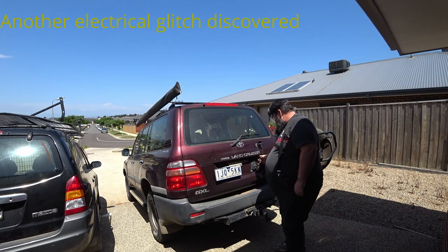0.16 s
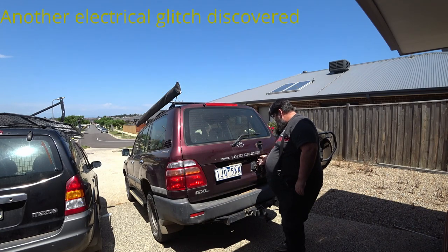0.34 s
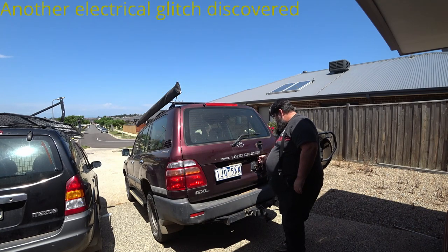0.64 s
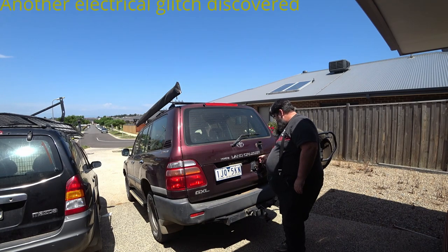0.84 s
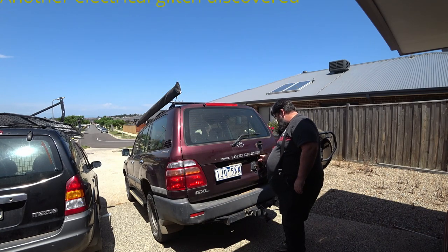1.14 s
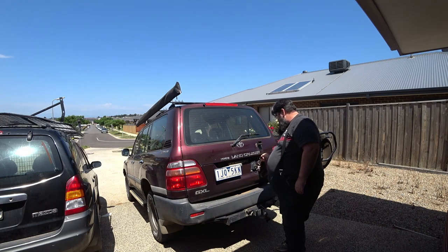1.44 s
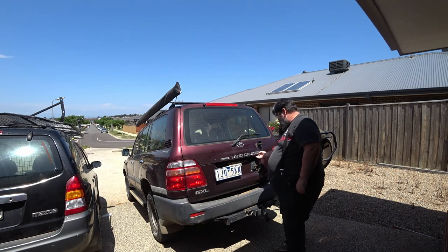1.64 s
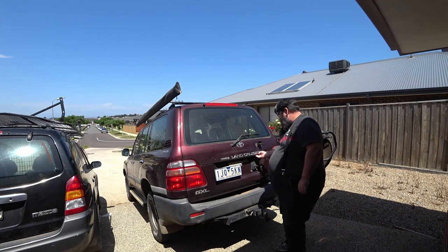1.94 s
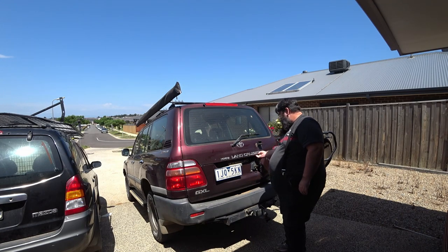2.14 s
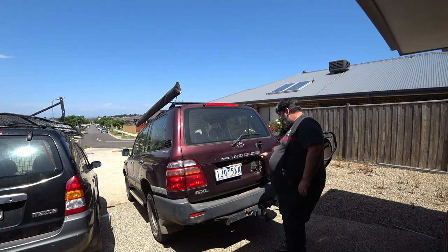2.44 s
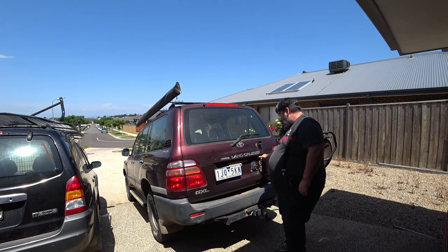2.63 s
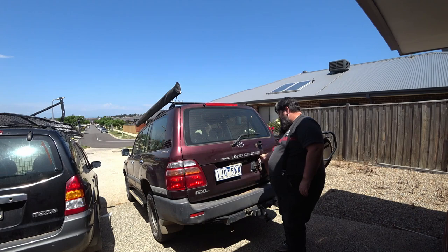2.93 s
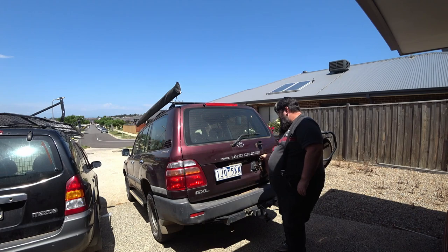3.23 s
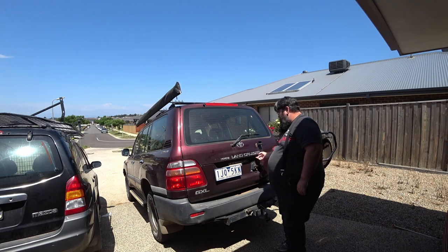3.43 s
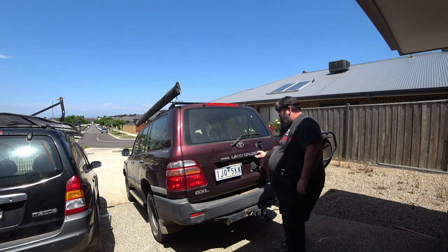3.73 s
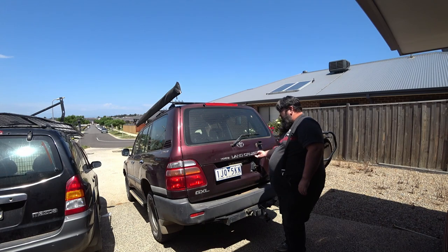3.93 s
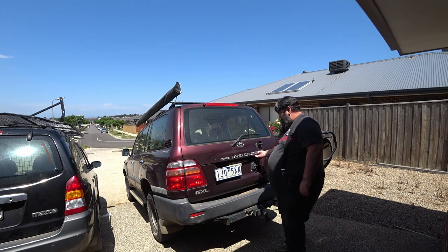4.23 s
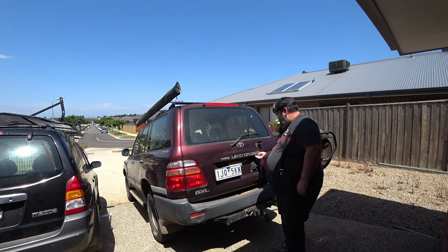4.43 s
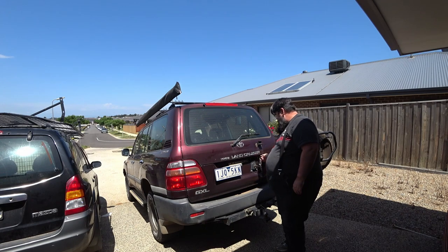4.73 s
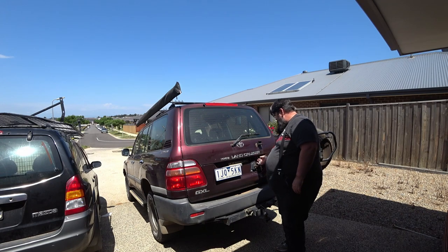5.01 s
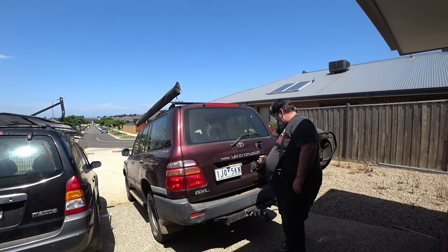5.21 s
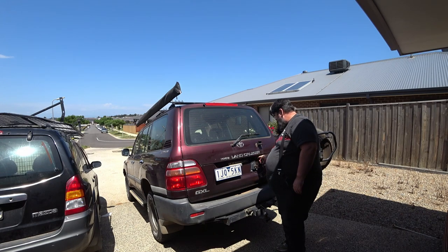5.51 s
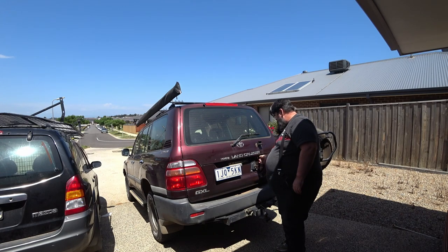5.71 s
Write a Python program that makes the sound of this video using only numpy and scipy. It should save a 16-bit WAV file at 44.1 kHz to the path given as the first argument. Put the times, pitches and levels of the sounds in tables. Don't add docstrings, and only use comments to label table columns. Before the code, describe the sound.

Close up under a carport, a bunch of keys jingles and scrapes against a vehicle's rear door. A loud, hard clack comes about a second and a half in, then spaced handle thumps, a sharp double knock at four and a half seconds, faint spring squeaks, and more key rattling. Distant birds whistle briefly behind. Stereo microphone nearby, with light wind rumble and far traffic.

```python
import sys
import numpy as np
from scipy import signal
from scipy.io import wavfile
from scipy.ndimage import uniform_filter1d

SR = 44100
rng = np.random.default_rng(int(sys.argv[2]) if len(sys.argv) > 2 else 0)


def transcribe(u):
    v = np.clip(np.atleast_2d(u).T, -1, 1)
    q = np.round(v * 32767).astype(np.int16)
    wavfile.write(sys.argv[1], SR, q)


def invert_db(x):
    u = np.asarray(x, float) / 20
    return 10 ** u


N = 258602
CONTACT_S = 0.002


# start_s, peak_db, boom_share_db, ring_s
HANDLE_PULLS = [(.71, -32.5, -8, 0.23), (.988, -41.5, -6, 0.5), (1.099, -43, 1.5, 0.21),
                (1.687, -42, -33, 0.45), (1.951, -30, -6, 0.19), (2.335, -15, -7.5, 0.15),
                (2.831, -55.5, 14.5, 0.3), (2.958, -19, -7, 0.26), (3.138, -44.5, -3.5, 0.61),
                (3.663, -38.5, -9, 0.26), (3.749, -27, 0.5, 0.065), (4.3, -41.5, -3.5, 0.23),
                (4.463, -60, -2, 1), (4.522, -12.5, -7, 0.16), (4.5615, -22, -1, 0.087),
                (5.368, -31, -13, 0.2)]
# start_s, peak_db, boom_share_db, ring_s
LATCH_CATCHES = [(0.364, -34, -57.5, 0.17), (.579, -32, -11, 0.13), (1.122, -39, -18, 0.2),
                 (1.405, -12.5, -11.5, 0.29), (1.423, -17, -13, 0.17), (1.825, -44, -9, 0.32),
                 (2.069, -47, -2.5, 0.22), (3.198, -37, -15, 0.22), (3.369, -47, -18, 0.15),
                 (3.705, -39, -16, 0.17), (3.76, -27, -6.5, 0.19), (5.079, -37.5, -4, 0.33),
                 (5.170, -28.5, -9, 0.24), (5.336, -31.5, -11.5, 0.22), (5.427, -38.5, -7, 0.28),
                 (4.5235, -7.5, -33, 0.072), (4.541, -21.5, -23, 0.15), (4.554, -21, 6, 0.035)]
# start_s, peak_db, boom_share_db, ring_s
ROD_RAPS = [(0.0, -33, -7, 0.28), (0.153, -37.5, 0, 0.51), (.175, -30, -24, 0.17), (.254, -40.5, -25, 0.38),
            (1.447, -16, -16, 0.37), (3.261, -37.5, -21, 0.11), (5.1895, -24, -14, 0.24),
            (5.203, -31.5, -3.5, 0.26), (5.217, -27.5, -25, 0.09), (5.778, -37.5, -2.5, 0.099)]
# start_s, peak_db, boom_share_db, ring_s
HANDLE_NUDGES = [(0.376, -33, -15, 0.043), (0.591, -31.5, -24, 0.047), (0.604, -37, -3, 0.13),
                 (0.618, -40, -20, 0.081), (0.726, -33.5, 0, 0.05), (0.737, -38, 1, 0.12),
                 (0.758, -40, -10, 0.07), (1.006, -55, -12, 0.055), (1.024, -59, 5, 0.058),
                 (1.067, -39, -7, 0.11), (1.098, -33, -12, 0.065), (1.112, -33, -10, 0.095),
                 (1.133, -37, -12, 0.07), (1.149, -45.5, -16, 0.082), (3.179, -37, -10, 0.07),
                 (3.372, -32.5, -9, 0.05), (3.398, -45, -13, 0.07), (5.097, -26.5, -10, 0.028),
                 (5.348, -31, -12, 0.07), (5.384, -47, -12, 0.11)]
# favoured_hz, share_1500_to_4000_hz_db
KNOCKING_PARTS = [
    (577, -14.5),
    (1020, -3),
    (1890, -6),
    (1210, -8.5),
]


def knocks():
    return by_part([HANDLE_PULLS, LATCH_CATCHES, ROD_RAPS, HANDLE_NUDGES], KNOCKING_PARTS)


def knock_db(hz):
    s, peak, boom, ring_s, centre, bright = knocks().T
    top = np.interp(np.log(hz), np.log([1200, 2200]), [0, 1]) * (bright + 8)
    bottom = np.interp(np.log(hz), np.log([280, 420]), [1, 0]) * (boom + 10)
    return peak + top + bottom + favoured(hz, centre, lift_db=5.0, octaves=0.41)


# start_s, peak_db, share_1500_to_4000_hz_db, ring_s, free_ring_db
BARREL_TURNS = [(.1501, -23.5, -2.5, 0.29, -9), (.174, -32, 7, 0.11, -6), (.2109, -23.5, -2.5, 0.2, -17),
                (.5916, -32, -33, 0.15, 6), (.7068, -29.5, -2, 0.11, -1.5), (1.0894, -33.5, -15, 0.21, 3),
                (1.4052, -8.5, -30, 0.15, -14), (1.946, -47.5, 11.5, 0.043, 3),
                (3.7604, -31.5, 2, 0.029, 3), (4.2986, -43.5, 7, 0.22, -11), (5.1317, -32, -26, 0.036, 2),
                (5.3328, -27.5, -1, 0.053, -18), (5.3597, -28.5, 6, 0.16, -13)]
BIG_KEY_TOUCHES = [(.1251, -37, -1, 0.14, -17), (0.506, -30.5, -11.5, 0.06, 4),
                   (0.251, -27, 1.5, 0.15, -30), (0.3634, -30.5, 2, 0.081, -30),
                   (0.8134, -35.5, -10, 0.1, 3), (.8315, -37, -1.5, 0.19, -7), (.889, -38, -8, 0.11, 0),
                   (.9308, -32.5, -2, 0.14, -15.5), (1.4463, -4, -3, 0.17, -18),
                   (1.5935, -26, -11.5, 0.11, -1), (2.3316, -57, 30, 0.038, 2), (3.16, -39.5, 2, 0.14, -27),
                   (3.197, -38, 3, 0.082, -16), (3.2878, -28, -3.5, 0.029, -23),
                   (4.521, -25, 10, 0.12, -20), (5.0809, -23.5, -2.5, 0.11, -7),
                   (5.1696, -35, -16, 0.095, -12), (5.1905, -35.5, -5, 0.1, 16),
                   (5.206, -30.5, -12, 0.14, -8)]
MIDDLE_KEY_TOUCHES = [(0.0134, -33, -4, 0.22, 7), (0.708, -34.5, 5.5, 0.12, 5.5),
                      (0.308, -35.5, -2, 0.056, 2), (0.323, -42, 10, 0.17, -6),
                      (1.025, -35.5, 7, 0.052, 11), (1.4256, -9.5, -2, 0.27, -12),
                      (1.664, -42.5, 1, 0.051, -3), (1.709, -32, -8.5, 0.14, -0.5),
                      (1.76, -34, -1.5, 0.096, -4), (2.9077, -40, -3.5, 0.97, -11),
                      (2.9558, -17, 0, 0.16, -22), (3.135, -40, 2, .06, -7), (3.2563, -29, -7.5, 0.16, 3),
                      (4.843, -19.5, -2, 0.12, -4), (4.855, -23.5, -7.5, 0.11, 9),
                      (4.9556, -26.5, -3.5, 0.078, 3), (4.9918, -27, -11.5, 0.069, -12),
                      (5.324, -37.5, 4.5, 0.07, 0), (5.429, -39, 8, 0.12, 6), (5.4736, -27, -4, 0.11, -1),
                      (5.777, -32.5, -3.5, 0.13, -2), (5.8205, -23.5, 2, 0.076, -12)]
SMALL_KEY_TOUCHES = [(0.385, -34, -15, 0.13, -10), (.4454, -32.5, -27, 0.073, -13),
                     (.5227, -34, -0.5, 0.097, -4), (.608, -42, -25, .05, -8),
                     (0.6655, -40.5, -19, 0.074, -5), (.741, -35, -20, 0.055, -5),
                     (1.144, -37, -25, 0.044, -8), (1.168, -34.5, -4, 0.041, 1),
                     (0.999, -29, -8, 0.11, -20), (1.8218, -42, -13, 0.05, -6),
                     (1.838, -40, -25, 0.039, -23), (5.2996, -32.5, -23, 0.09, 3),
                     (5.4902, -33.5, 2.5, 0.28, -7), (5.5752, -25, -13, 0.13, 4.5),
                     (5.683, -37, -30, 0.17, -6)]
RING_PINGS = [(.405, -28.5, -9, 0.083, 0), (0.557, -31, -37, 0.17, -11), (0.7276, -29, -21, 0.14, -0.5),
              (0.8298, -24.5, -11, 0.13, -2), (0.85, -24, -7, 0.092, 1), (0.893, -36.5, -7, 0.14, 4.5),
              (1.031, -35, -2, 0.21, 4), (1.154, -37, -16, 0.094, 6), (1.2216, -43, -2.5, 0.1, 7.5),
              (1.057, -41.5, -30, 0.11, 6), (1.263, -29.5, -49, 0.047, 5), (1.34, -44.5, -8, 0.29, -6),
              (1.3805, -25.5, -3, 0.19, -3), (1.512, -34, -30, 0.2, 3.5), (1.711, -47.5, -22, 0.39, 2),
              (3.0711, -27, 1, 0.067, -12), (3.3357, -37, 3.5, 0.16, -3), (5.641, -35, -6, 0.36, -2),
              (5.665, -35.5, -1, .1, 3.5), (5.705, -35, -20, 0.065, -4), (5.735, -41, -15, 0.071, -3)]
TAG_PINGS = [
    (.19, -46, -20, 0.12, 3),
    (.45, -40, -20, .15, -6),
    (5.59, -38, -25, .15, 0),
    (5.685, -36, -27, 0.23, 6),
]
BUNCH_PARTS = [
    (1760,),
    (2140,),
    (2940,),
    (6900,),
    (8650,),
    (7634,),
]


def jingle():
    touches = [BARREL_TURNS, BIG_KEY_TOUCHES, MIDDLE_KEY_TOUCHES, SMALL_KEY_TOUCHES, RING_PINGS, TAG_PINGS]
    return by_part(touches, BUNCH_PARTS)


def jingle_db(hz):
    s, peak, lower, ring_s, metal, centre = jingle().T
    reach = np.interp(np.log(hz), np.log([3300, 4800]), [1, 0]) * (lower + 12)
    return peak + reach + favoured(hz, centre, lift_db=6.0, octaves=0.21)


# start_s, bright_db, dull_db
SLIDES = [
    [(0.0, -30, -36.5), (0.276, -30, -47.5), (1.406, -35, -56), (1.586, -30.5, -48), (1.95, -43, -61)],
    [(2.88, -41, -51), (3.162, -29.5, -48), (3.43, -43, -42.5)],
    [(4.83, -35.5, -47.5), (5.406, -32, -68), (5.86, -31, -41.5)],
]


def sliding_db():
    return np.max([in_time(rows, -150) for rows in SLIDES], axis=0)


# pitch_hz, level_db per Hz
KNOCK_TONE = [(40, -20), (75, -12), (170, -3), (260, -10.5), (350, -5), (520, -8.5), (900, -4),
              (2000, -9.5), (7400, -25.5), (11000, -84)]
# pitch_hz, level_db per Hz
JINGLE_TONE = [(710, -21), (1200, -19.5), (1560, -13), (1800, -32), (2160, -14.5), (3430, -11.5), (8500, 0),
               (11500, -26.5), (15000, -47), (22000, -120)]
# pitch_hz, likeness (-1 to 1)
DOOR_ALIKE = [(60, 0.98), (220, 1), (830, 0.9), (3110, 0.61), (11600, 0.74)]


def handling():
    blows, touches, chatter = knocks(), jingle(), drift(124.0)
    bright_db, dull_db = sliding_db()

    def envelope(hz):
        longer = (hz / 1000) ** -0.3
        panel_db, keys_db = at_hz(KNOCK_TONE, hz), at_hz(JINGLE_TONE, hz)
        blow_db = knock_db(hz) + panel_db + 4.5
        touch_db = jingle_db(hz) - 7.5 + keys_db
        power = dying(blows[:, 0], blow_db, blows[:, 3] * longer, crack_db=5.5, crack_s=0.015, rise_s=0.0041)
        power += dying(touches[:, 0], touch_db, touches[:, 3], crack_db=5.0, crack_s=0.027, rise_s=0.002)
        power *= invert_db(4.2 * chatter)
        power += invert_db(2 * (bright_db - 23.0 + keys_db) + 7.5 * drift(27.0) + 7.9 * chatter)
        power += invert_db(2 * (dull_db + 5.5 + panel_db) + 2.1 * drift(34.5))
        return np.sqrt(power)
    return bands(envelope, DOOR_ALIKE)


# pitch_hz, level_db, time_to_fall_60_db_s
PANEL_MODES = [(71.5, -10, 0.12), (214.7, -22.5, 0.23), (243.5, -8, 0.37), (264.4, -2.5, 0.24),
               (442.5, 1.5, 0.064), (460.6, -11.5, 0.39), (508, -6, 0.22), (586, -3, 0.14), (685, -15, 0.1),
               (814.7, -5.5, 0.21), (900, -7, 0.16), (936, 5.5, 0.041), (1222, 1, 0.068),
               (1013, -4.5, 0.12), (1493, -3, 0.06), (1656, 3.5, 0.043), (1900, -15.5, 0.1),
               (2090, -6, 0.11), (2200, -18.5, 0.3), (2200, -20, 0.18), (2466, -11, 0.2),
               (2980, -14, 0.095), (2954, -44, 0.13), (3480, -22, 0.057)]
# pitch_hz, level_db, time_to_fall_60_db_s
KEY_MODES = [(1760, -22.5, 0.21), (2123, -15.5, 0.16), (2167, -8, 0.076), (2941, -22.5, 0.15),
             (3470, -12.5, 0.16), (4700, -21, 0.078), (5114, -2.5, 0.042), (5880, -14, 0.01),
             (6960, 1.5, 0.035), (6780, -19, 0.16), (7700, -8, 0.039), (7634, -24, 0.15), (8030, -1, 0.027),
             (8200, -27, 0.12), (8030, -5.5, 0.14), (8735, -7, 0.12), (10600, -7, 0.065)]


def ringing():
    blows, touches = knocks(), jingle()
    blow_damping = blows[:, 3] / 0.24
    panel = invert_db(-11.0) * strike(PANEL_MODES, blows[:, 0], knock_db, blow_damping, spread_db=2.5)

    metal_db = touches[:, 4] - 2 * np.clip(touches[:, 2], 0, None)

    def key_db(hz):
        return jingle_db(hz) + metal_db + favoured(hz, touches[:, 5], lift_db=10, octaves=0.04)
    keys = invert_db(-17) * strike(KEY_MODES, touches[:, 0], key_db, touches[:, 3] / 0.26, spread_db=4)
    keys *= invert_db(5.4 * drift(106))

    times = rng.uniform(0, (N - 1) / SR, 400)
    effort_db = sliding_db()[0][np.round(times * SR).astype(int)]
    trembling = invert_db(-6) * strike(KEY_MODES, times, lambda hz: effort_db, 0.1, spread_db=4)
    return panel + keys + trembling


# start_s, pitch_hz, level_db, time_to_fall_60_db_s
SINGLE_NOTES = [(.002, 2870, -37, 0.22), (0.152, 1760, -39.5, 0.18), (.177, 1760, -30, 0.15),
                (.158, 7600, -42, .15), (.478, 7000, -44, .08), (2.336, 505, -21, 0.12),
                (2.338, 1047, -29.5, .12), (3.708, 847, -44, 0.17), (4.5235, 890.6, -12, 0.067),
                (4.542, 896, -20, 0.1), (4.85, 8700, -47, 0.26), (5.19, 1987, -28.5, .1),
                (5.58, 8200, -42, 0.14), (5.684, 6961, -42, 0.17), (5.685, 7634, -47, 0.2)]


def notes():
    out, t = np.zeros(N + SR), np.arange(SR // 3) / SR
    beat = 0.0128
    for s, hz, level_db, t60 in SINGLE_NOTES:
        pair = np.sin(2 * np.pi * hz * t) + 0.34 * np.sin(2 * np.pi * hz * (1 + beat) * t)
        shape = (1 - np.exp(-t / CONTACT_S)) * invert_db(level_db - 60 * t / t60)
        out[round(s * SR):][:len(t)] += pair * shape
    return out[:N]


# start_s, length_s, slips_per_s, level_db, unevenness (0-1)
SPRING_SQUEAKS = [
    (4.32, .12, 684, -56, .02),
    (4.59, .09, 627, -55, .004),
    (4.66, .09, 627, -61, .012),
]
# pitch_hz, level_db
SPRING_TONE = [(2500, -22), (3100, -12), (3770, 0), (4400, -8), (5000, -13), (7500, -19), (9000, -30)]


def squeak():
    out, s = np.zeros(N), np.arange(N) / SR
    rub = signal.butter(2, [2800, 8000], "band", fs=SR, output="sos")
    haze = rms_one(signal.sosfilt(rub, rng.standard_normal(N)))
    for start, length, slips, level_db, uneven in SPRING_SQUEAKS:
        swell = np.sin(np.pi * np.clip((s - start) / length, 0, 1)) * invert_db(level_db)
        phase = 2 * np.pi * np.cumsum(slips * (1 + uneven * drift(54.5))) / SR
        comb = np.zeros(N)
        for k in range(4, 14):
            comb += invert_db(at_hz(SPRING_TONE, k * slips) + 2.5 * drift(90)) * np.sin(k * phase)
        out += swell * (comb + invert_db(-3) * haze)
    return out


# start_s, level_db
PIN_DROPS = [
    (.7278, -20),
    (1.2632, -16),
    (1.3822, -3),
    (4.5222, -16),
    (4.8436, -20),
]


def snap():
    clicks = np.zeros(N)
    for s, level_db in PIN_DROPS:
        clicks[round(s * SR)] = invert_db(level_db)
    return signal.sosfilt(signal.butter(2, 5500, "high", fs=SR, output="sos"), clicks)


# start_s, pitch_hz, level_db
ARCHED_CALL = [
    (0.32, 4900, -63),
    (0.35, 6200, -57),
    (.385, 6150, -59),
    (.44, 4750, -57),
    (0.51, 4650, -64),
]
# start_s, length_s, level_db
FLICKS = [
    (2.04, .055, -60),
    (2.083, .045, -62),
    (2.114, .05, -62),
    (2.258, .075, -61),
]
# start_s, length_s, level_db
FAR_FLICKS = [
    (3.92, .08, -70),
    (4.005, .1, -63),
]
# start_s, start_hz, peak_hz, level_db, fade_db_per_s, length_s, drop_db
FALLING_NOTES = [
    (2.492, 4900, 5350, -48.5, 75, .2, 11),
    (2.705, 3200, 5400, -46, 115, .14, 2),
]


def bird():
    near = [ARCHED_CALL] + [flick(*row) for row in FLICKS]
    song = whistle(near, octave_db=0, wobble=0.012, hoarse=0.5)
    song = song + whistle([flick(*row) for row in FAR_FLICKS], octave_db=-25, wobble=0.008, hoarse=0.4)
    song = song + whistle([fall(*row) for row in FALLING_NOTES], octave_db=-9, wobble=0.021, hoarse=0.9)
    late = np.roll(song, round(0.008 * SR))
    return song * invert_db(np.array([[-1.5], [1.5]])) + invert_db(-4.5) * space(late, 0.42, cut_hz=9000)


def flick(start, length, level_db):
    low_hz, top_hz, climb_s = 2230, 3550, 0.047
    t = np.linspace(0, length, num=12)
    hz = low_hz + (top_hz - low_hz) * np.sin(np.pi / 2 * np.clip(t / climb_s, 0, 1))
    quieter_db = 5 * np.clip(1 - t / climb_s, 0, 1)
    return np.transpose([start + t, hz, level_db - quieter_db])


def fall(start, start_hz, peak_hz, level_db, fade, length, drop_db):
    climb_hz_per_s, sag_s, sag_to_hz, creep_hz_per_s = 100000, 0.034, 3250, 4500
    t = np.linspace(0, length, num=60)
    climb_s = max((peak_hz - start_hz) / climb_hz_per_s, 0.01)
    climb = start_hz + (peak_hz - start_hz) * np.sin(np.pi / 2 * np.clip(t / climb_s, 0, 1))
    after = np.clip(t - climb_s, 0, None)
    sag = np.exp(-(after / sag_s) ** 1.7)
    hz = sag_to_hz - creep_hz_per_s * after + (climb - sag_to_hz) * sag
    level = level_db - fade * after - drop_db * (1 - np.exp(-after / sag_s))
    return np.transpose([start + t, hz, level])


def whistle(calls, octave_db, wobble, hoarse):
    out, s = np.zeros(N), np.arange(N) / SR
    for call in calls:
        hz, level_db = uniform_filter1d(in_time(call), size=250)
        on = np.clip((s - call[0][0]) / 0.006, 0, 1) * np.clip((call[-1][0] - s) / 0.01, 0, 1)
        octave = invert_db(octave_db) * np.clip((3550 - hz) / 400, 0, 1)
        phase = 2 * np.pi * np.cumsum(hz * (1 + wobble * drift(150.0))) / SR
        voice = np.sin(phase) + octave * np.sin(2 * phase)
        out += on * invert_db(level_db + 2) * (1 + hoarse * drift(600)) * voice
    return out


# pitch_hz, level_db per Hz
YARD_TONE = [(12, -31), (20, -2.5), (113, -0.5), (202, -15.5), (513, -12.5), (724, -18.5), (805, -17),
             (1300, -18), (2100, -24.5), (2890, -16.5), (3670, -31.5), (6940, -32.5), (10600, -36),
             (11500, -53), (15000, -78), (22000, -120)]
# pitch_hz, likeness (-1 to 1)
YARD_ALIKE = [(60, 1), (220, 0.82), (830, -0.58), (3110, 0.3), (11600, 0.17)]
# start_s, level_db
WIND_GUSTS = [
    (0.0, -30),
    (0.23, -43),
    (1.32, -37.5),
    (1.55, -37),
    (1.89, -39.5),
    (2.2, -28.5),
    (3.0, -41.5),
    (3.21, -51),
    (5.86, -48),
]


def yard():
    together = drift(1.0)

    def patchy(hz):
        return invert_db(at_hz(YARD_TONE, hz) + 0.9 * together + 2.1 * drift(11.4))
    far = invert_db(-50) * rms_one(bands(patchy, YARD_ALIKE))
    lumpy = rng.standard_normal(N) + 0.22 * rng.standard_normal((2, N))
    wind = rms_one(signal.sosfilt(signal.butter(2, [20, 130], "band", fs=SR, output="sos"), lumpy))
    gust_db = in_time(WIND_GUSTS)[0] - 18.5 + 0.43 * drift(2.6)
    whine_hz = 9950 + 60 * drift(150)
    whine = invert_db(-75) * np.sin(2 * np.pi * np.cumsum(whine_hz) / SR)
    return far + wind * invert_db(gust_db) + whine


def space(x, t60, cut_hz):
    t = np.arange(SR // 2) / SR
    alike = 0.63
    tail = alike * rng.standard_normal(len(t)) + (1 - alike) * rng.standard_normal((2, len(t)))
    tail = tail * invert_db(-60 * t / t60) * np.clip(t / 0.003, 0, 1)
    tail = signal.sosfilt(signal.butter(1, cut_hz, fs=SR, output="sos"), tail)
    tail /= np.sqrt(np.sum(tail ** 2, axis=1, keepdims=True))
    return signal.fftconvolve(np.broadcast_to(x, (2, N)), tail, axes=1)[:, :N]


def strike(modes, times, level_db, damping, spread_db):
    hz, mode_db, t60 = np.transpose(modes)
    out, t = np.zeros(N + SR), np.arange(int(max(t60) * SR))[:, None] / SR
    waves = np.sin(2 * np.pi * hz * t) * (1 - np.exp(-t / CONTACT_S))
    chance = rng.standard_normal((len(times), len(modes), 2))
    hit_db = np.transpose([level_db(f) for f in hz])
    heights = invert_db(hit_db + mode_db + spread_db * chance[..., 0]) * np.sign(chance[..., 1])
    for s, height, scale in zip(times, heights, damping * np.ones(len(times))):
        n = int(min(scale, 1) * len(t))
        decay = np.exp(-np.log(1000) * t[:n] / (scale * t60))
        out[round(s * SR):][:n] += (waves[:n] * decay) @ height
    return out[:N]


def dying(times, level_db, t60, crack_db, crack_s, rise_s):
    power, t = np.zeros(N + SR), np.arange(SR // 3) / SR
    rise = 1 - np.exp(-t / rise_s)
    for s, db, ring_s in zip(times, level_db, t60):
        n = min(len(t), int(max(ring_s, crack_s) * SR))
        decay = invert_db(-120 * t[:n] / ring_s) + invert_db(2 * crack_db - 120 * t[:n] / crack_s)
        power[round(s * SR):][:n] += invert_db(2 * db) * rise[:n] * decay
    return power[:N]


def favoured(hz, centre_hz, lift_db, octaves):
    return lift_db * np.exp(-0.5 * (np.log2(hz / centre_hz) / octaves) ** 2)


def by_part(tables, parts):
    return np.array([(*hit, *part) for table, part in zip(tables, parts) for hit in table])


# pitch_hz, left_minus_right_db
LEFT_LEAN = [(60, -0.5), (220, 0), (830, 0), (3110, -1), (11600, 1.5)]
EDGES = 22 * 2 ** np.arange(0, 9.6, 0.5)


def bands(envelope, likeness):
    out, white = 0, rng.standard_normal((2, 2, N))
    for k, (low, high) in enumerate(zip(EDGES, EDGES[1:])):
        hz = np.sqrt(low * high)
        band = signal.butter(2, [low, high], "band", fs=SR, output="sos")
        mid, side = signal.sosfilt(band, white[k % 2] * envelope(hz))
        alike = np.clip(at_hz(likeness, hz), -0.5, 1)
        lean = at_hz(LEFT_LEAN, hz) / 2
        stereo = np.sqrt(1 + alike) * mid + np.sqrt(1 - alike) * side * [[1], [-1]]
        out = out + stereo * invert_db(np.array([[lean], [-lean]]))
    return out


def in_time(rows, outside=None):
    s, *columns = np.transpose(rows)
    return [np.interp(np.arange(N) / SR, s, c, outside, outside) for c in columns]


def at_hz(points, hz):
    return np.interp(np.log(hz), np.log(np.array(points)[:, 0]), np.array(points)[:, 1])


def rms_one(x):
    return x / np.sqrt(np.mean(x ** 2) + 1e-20)


def drift(rate):
    r = np.exp(-80 * np.pi * rate / SR)
    slow = signal.lfilter([1], [1, -2 * r, r * r], rng.standard_normal(N // 40 + 2002))[2000:]
    return np.interp(np.arange(N) / 40, np.arange(len(slow)), rms_one(slow))


def scene():
    door = handling() + (ringing() + notes() + squeak() + snap()) * invert_db(np.array([[-0.6], [0.6]]))
    door = signal.sosfilt(signal.butter(1, [150, 205], "bandstop", fs=SR, output="sos"), door)
    echoes = space(door, 0.23, cut_hz=5900)
    echoes = signal.sosfilt(signal.butter(1, 350, "high", fs=SR, output="sos"), echoes)
    return door + invert_db(-13.5) * echoes + bird() + yard()


def band_limit(x):
    return signal.sosfilt(signal.butter(12, 12200, fs=SR, output="sos"), x)


def record(dry):
    mix = signal.sosfilt(signal.cheby2(16, 44, 11500, fs=SR, output="sos"), dry)
    return band_limit(mix)


dry = scene()
out = record(dry)
transcribe(out)
```